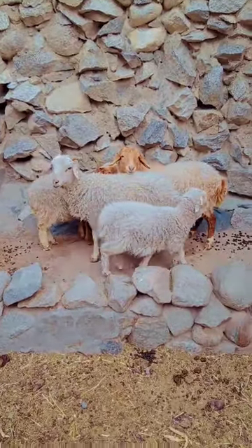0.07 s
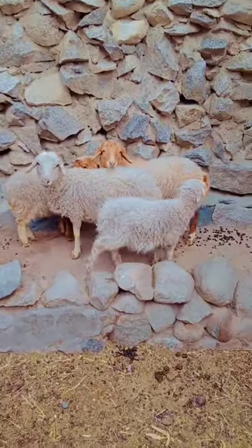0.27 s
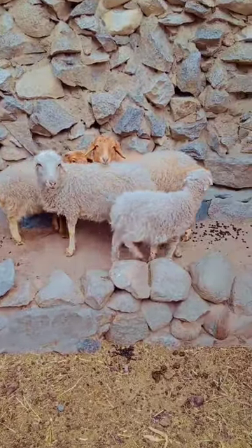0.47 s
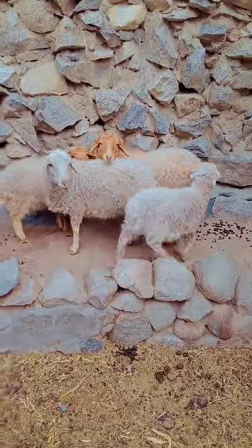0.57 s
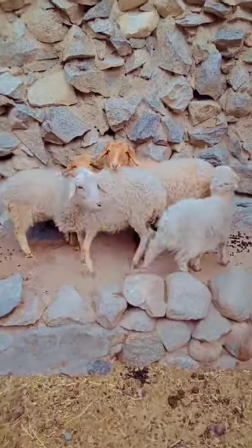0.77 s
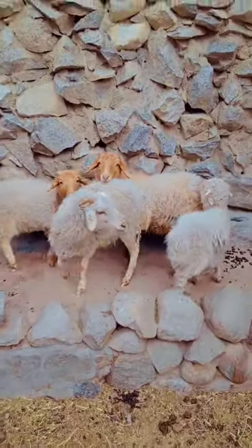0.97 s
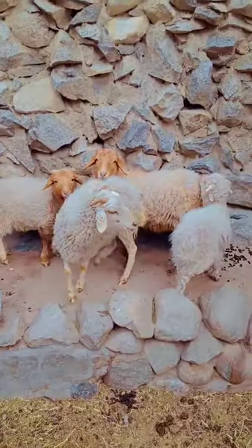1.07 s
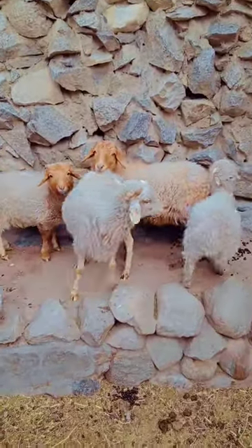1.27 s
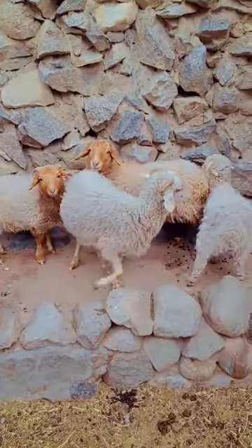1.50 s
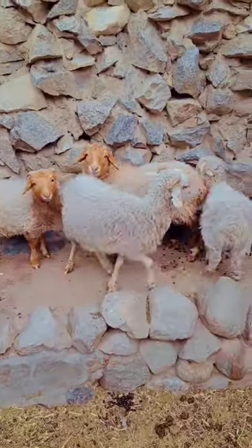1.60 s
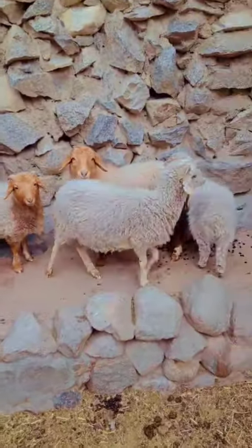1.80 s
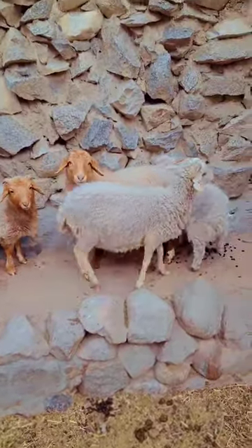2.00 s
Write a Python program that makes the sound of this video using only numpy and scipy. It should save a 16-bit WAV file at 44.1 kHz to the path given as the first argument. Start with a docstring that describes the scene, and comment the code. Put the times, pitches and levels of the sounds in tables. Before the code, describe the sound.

Sheep hooves step on hard, sandy earth by a stone wall, over a faint outdoor hiss. First, dull wind thumps hit the microphone from 0.2 to 0.6 seconds, loudest near 0.3, with soft scuffs. Uneven hoof knocks and gritty clacks begin around 0.7 seconds, strongest at about 1.0 and 1.1. Lighter steps, scuffs and tiny sand ticks continue until 2 seconds as the rumble fades.

```python
"""Dull thumps of wind buffet the microphone over a faint outdoor hiss; then come the hooves of a few
sheep, shuffling on a ledge of hard earth in front of a rough stone wall.
Each step gives a hollow knock from the ground, a clack of horn and a spit of grit, scattered back
by the stones. Some hooves scuff or land with a soft thud, and grains of sand crack underfoot."""
import sys
import numpy as np
from scipy import signal
from scipy.fft import rfft, irfft
from scipy.io import wavfile

SR = 44100
rng = np.random.default_rng(int(sys.argv[2]) if len(sys.argv) > 2 else 0)


def persist_wave(psi):
    """Save psi, clipped to +-1, as 16-bit WAV."""
    counts = np.round(np.clip(psi, -1, 1) * 32767).astype(np.int16)
    wavfile.write(sys.argv[1], SR, np.atleast_2d(counts).T)


N = 90404
GRAIN_SPREAD_DB = 3
# The bright tone of sandy grit. Each row: frequency in Hz, gain in dB.
GRIT = [(800, -7), (2500, -40), (4500, -5.5), (5500, 7.5), (7200, 7), (9000, -7.5), (13000, -6.5),
        (16000, -16)]


def undb(db):
    """Decibels to gain."""
    return 10 ** (np.asarray(db) / 20)


def unit(x):
    """Scale to rms 1."""
    return x / np.sqrt(np.mean(x ** 2))


def curve(points):
    """A fader ride through points of (seconds, dB)."""
    return undb(np.interp(np.arange(N) / SR, *np.array(points).T))


def colour(x, points):
    """Minimum-phase EQ through points of (Hz, dB): nothing rings ahead of an attack."""
    size = 8192
    hz, db = np.array(points).T
    bin_hz = np.arange(size // 2 + 1) * SR / size
    gain = undb(np.interp(np.log(bin_hz + 1), np.log(hz), db))
    cepstrum = irfft(np.log(gain))
    cepstrum[1:size // 2] *= 2
    cepstrum[size // 2 + 1:] = 0
    impulse_response = irfft(np.exp(rfft(cepstrum)))
    return signal.fftconvolve(x, impulse_response)[:len(x)]


def grains(size, spread_db=GRAIN_SPREAD_DB):
    """Noise made of tiny grains of very different strength."""
    return unit(rng.standard_normal(size) * undb(spread_db * np.minimum(rng.exponential(size=size), 5)))


def fade(t, t60):
    """Exponential decay, 60 dB in t60 seconds."""
    return np.exp(-np.log(1000) * t / t60)


def burst(x):
    """Scale a short sound to the energy of 10 ms at rms 1."""
    return x / np.sqrt(np.sum(x ** 2) / (SR * .01))


def tail(x, db):
    """Set a tail's energy in dB relative to a unit click."""
    return x * undb(db) / np.sqrt(np.sum(x ** 2))


def ring(t, modes, detune=.006):
    """Damped modes, tuned a little differently for each blow."""
    out = 0
    for hz, db, t60 in modes:
        tuned_hz = hz * (1 + detune * rng.standard_normal())
        out += undb(db) * fade(t, t60) * np.sin(2 * np.pi * tuned_hz * t)
    return out


def hiss():
    """Fine rustle of air, wool and straw, brighter in the strongest gust; loose sand ticks at random."""
    # The ride of the hiss and its ticks. Each row: time in seconds, level in dB.
    hiss_levels = [(0, -71.5), (.09, -63.5), (.18, -70), (.29, -62), (.35, -62), (.48, -59.5), (.6, -60.5),
                   (.78, -59), (.95, -64.5), (1.05, -60), (1.2, -67), (1.35, -62), (1.5, -64),
                   (1.69, -69.5), (1.78, -63), (1.91, -71), (2.05, -71)]
    # The tone of the outdoor air. Each row: frequency in Hz, gain in dB.
    air_tone = [(100, -7), (350, 10.5), (700, 4), (1200, 1), (1900, 1), (3200, -1.5), (4500, -11.5),
                (7200, -7), (9500, -14.5), (13000, -12.5), (16000, -16.5)]
    # The tone of rustling wool and straw. Each row: frequency in Hz, gain in dB.
    rustle_tone = [(1000, -1), (3000, -5), (4500, -6), (7200, -1), (9500, -12), (13000, -15), (16000, -27)]
    gust_s, gust_width_s, rustle_db = .31, .034, -60.5
    ticks_per_s, tick_db, tick_spread_db = 31, -17, 4
    t = np.arange(N) / SR
    swell = undb(rustle_db) * np.exp(-.5 * ((t - gust_s) / gust_width_s) ** 2)
    rustle = swell * unit(colour(rng.standard_normal(N), rustle_tone))
    triggers = rng.random(N) < ticks_per_s / SR
    sand = triggers * undb(tick_db + tick_spread_db * rng.standard_normal(N))
    tick = burst(colour(signal.unit_impulse(SR // 100), GRIT))
    ticks = signal.fftconvolve(sand, tick)[:N]
    air = unit(colour(grains(N, spread_db=3.5), air_tone))
    return curve(hiss_levels) * (air + ticks) + rustle


def wind():
    """Eddies hit the microphone as single dull thumps within a gusting rumble."""
    # The gusts in the rumble. Each row: time in seconds, level in dB.
    gust_levels = [(0, -73), (.08, -60.5), (.18, -70.5), (.25, -35.5), (.295, -25), (.335, -43.5),
                   (.40, -48.5), (.46, -34), (.51, -34), (.54, -52.5), (.63, -44.5), (.71, -54.5),
                   (.8, -59), (.96, -62.5), (1.015, -44), (1.09, -56), (1.19, -65.5), (1.26, -53.5),
                   (1.43, -53.5), (1.5, -64), (1.65, -57.5), (1.7, -62), (1.78, -55), (1.89, -77.5),
                   (2.05, -64.5)]
    # The tone of the rumble. Each row: frequency in Hz, gain in dB.
    rumble_tone = [(20, -64.5), (40, -15), (65, -0.5), (110, -0.5), (160, -6), (230, -9.5), (330, -18),
                   (480, -34.5), (900, -51.5), (3000, -68.5)]
    # The thumps. Each row: centre in seconds, peak level in dB, pitch in Hz.
    buffets = [(0.239, -30, 103), (0.277, -16, 112.5), (0.295, -29.5, 340), (.301, -18.5, 139),
               (0.318, -30.5, 160), (0.43, -27.5, 135), (.472, -23, 138), (0.5, -27.5, 190),
               (.513, -32, 107), (0.557, -29.5, 134), (0.609, -30.5, 92), (0.657, -38, 111),
               (0.789, -45, 101), (.90, -52, 68), (1.015, -36, 120), (1.24, -39.5, 79), (1.354, -35, 98),
               (1.42, -38, 139), (1.454, -41.5, 112)]
    width_cycles = .46
    t = np.arange(N) / SR
    out = curve(gust_levels) * unit(colour(rng.standard_normal(N), rumble_tone))
    for at, db, hz in buffets:
        cycles = (t - at) * hz
        out -= undb(db) * np.exp(-.5 * (cycles / width_cycles) ** 2) * np.cos(2 * np.pi * cycles)
    return out


def sand_cracks():
    """Grains of sand break under a hoof with a thin, very bright tick."""
    # The breaking grains. Each row: start in seconds, level in dB.
    cracks = [(0.3647, -68), (.375, -66.5), (.639, -64.5), (1.569, -67.5), (1.591, -71), (1.662, -70),
              (1.823, -65.5)]
    # The tone of a crack. Each row: frequency in Hz, gain in dB.
    crack_tone = [(2000, -9), (5000, -6), (7500, 4), (10000, 0.5), (14000, -3.5), (16000, -3.5)]
    decay_s = .0045
    out, t = np.zeros(N + SR), np.arange(SR // 20) / SR
    for at, db in cracks:
        snap = grains(len(t)) * np.exp(-t / decay_s)
        start = int(at * SR)
        out[start:start + len(t)] += undb(db) * burst(colour(snap, crack_tone))
    return out[:N]


def scuffs_and_thuds():
    """Hooves scuff the sand or land with a soft ground thud: short, grainy swells."""
    # The scuffs and thuds. Each row: centre in seconds, half width in seconds, level in dB,
    # then thud and grit in dB relative to that level.
    contacts = [(0.086, 0.018, -72, 14, -1), (0.221, 0.0084, -64, -22, -9), (.2955, 0.0019, -60.5, 11, 2),
                (0.395, 0.01, -62.5, 13, -1.5), (.431, 0.0097, -48.5, -12, -47),
                (.451, 0.0035, -53.5, -2, -28), (0.559, 0.03, -59.5, 3.5, -11.5),
                (0.585, 0.0015, -68, 19, -19), (1.349, 0.0056, -64.5, 6, -7),
                (1.554, 0.012, -54.5, 0.5, -17), (1.83, 0.02, -70.5, 8.5, -27),
                (2.016, 0.0088, -68.5, 6, -9)]
    # The midrange rasp of a scuff. Each row: frequency in Hz, gain in dB.
    scrape_tone = [(500, -12), (1200, 9.5), (1750, 11.5), (2600, 15.5), (3500, 6.5), (4400, -9),
                   (9000, -15)]
    # The low thud of the ground. Each row: frequency in Hz, gain in dB.
    thud_tone = [(150, -0.5), (340, 19.5), (480, 1), (680, 9), (1000, 0), (1500, -19), (4000, -33.5)]
    out, t = np.zeros(N), np.arange(N) / SR
    scrape, thud, grit = (unit(colour(grains(N), tone)) for tone in (scrape_tone, thud_tone, GRIT))
    for at, half_width, db, thud_db, grit_db in contacts:
        swell = undb(db) * np.exp(-.5 * ((t - at) / half_width) ** 2)
        out += swell * (scrape + undb(thud_db) * thud + undb(grit_db) * grit)
    return out


def crush_and_echoes(t):
    """The spray after a contact: earth crumbles briefly, then the stone wall and the yard answer."""
    crush_s, wall_delay_s = .003, .0056
    arrived = t > wall_delay_s
    crush = tail(grains(len(t)) * np.exp(-t / crush_s), db=1)
    wall = tail(grains(len(t)) * fade(t, t60=.07) * arrived, db=0)
    yard = tail(rng.standard_normal(len(t)) * fade(t, t60=.24) * arrived, db=-13)
    return crush + wall + yard


def earth_knock(t, click, scatter):
    """A hoof on packed earth: a hollow ring over a dead thud."""
    # The hollow ring. Each row: frequency in Hz, level in dB, seconds to fall 60 dB.
    knock_modes = [(340, -13, .06), (598, 3, .06), (780, -2, .05), (945, -10, .05), (1130, -17, .035)]
    # The tone of the thud. Each row: frequency in Hz, gain in dB.
    thud_tone = [(100, 0), (250, -12), (450, -11), (650, 10), (900, 13.5), (1250, -5), (3000, -54)]
    scatter_db, thud_db = -12, -8
    strike = click + undb(scatter_db) * scatter
    hollow = burst(signal.fftconvolve(strike, ring(t, knock_modes))[:len(t)])
    thud = burst(colour(click + scatter, thud_tone))
    return hollow + undb(thud_db) * thud


def horn_clack(t, strike, tilt_db):
    """The hoof's horn clacks in broad, quickly damped resonances, with a brief ring inside."""
    # The tone of the clack. Each row: frequency in Hz, gain in dB.
    clack_tone = [(400, -19), (1000, -23.5), (1350, -5), (1680, 3.5), (2000, 3), (2280, -2), (2550, -1.5),
                  (3150, -2), (3750, -5), (4150, -14), (7000, -18.5), (15000, -68)]
    # The ring of the horn. Each row: frequency in Hz, level in dB, seconds to fall 60 dB.
    horn_modes = [(1680, 0, .04), (2290, -4, .04), (3110, -4, .04), (3630, -3, .045), (3790, -5, .04)]
    pivot_hz, ring_db = 1620, -5  # the tilt acts per octave above the pivot
    tilted_tone = [(hz, db + tilt_db * np.log2(max(hz / pivot_hz, 1))) for hz, db in clack_tone]
    tilted_modes = [(hz, db + tilt_db * np.log2(hz / pivot_hz), t60) for hz, db, t60 in horn_modes]
    return burst(colour(strike, tilted_tone)) + undb(ring_db) * burst(ring(t, tilted_modes))


def hooves():
    """Each contact is a click and its scattered tail, sounding earth, horn and grit together."""
    # The hoof contacts. Each row: start in seconds, level in dB, then knock, clack and grit
    # in dB relative to that level, and the clack's brightness tilt in dB per octave.
    steps = [(.667, -56, -9, 2, 3.5, 5), (0.6742, -45, -22, 0.5, -8, -1.5), (0.702, -60, -20.5, 3, -23, -3),
             (0.721, -63, -23, 2.5, -8, -5), (.855, -61, -7, -11, -2, -9), (.900, -59, -3.5, -1, -13, -4.5),
             (.978, -62, -26, 0, -6, -8), (.9863, -38.5, 2.5, -2.5, -17, -15.5),
             (.9932, -37.5, -6.5, -10.5, -28, -5), (1.0983, -48, -12, -0.5, -4, -5),
             (1.099, -36.5, -19, -3, -17, 4), (1.11, -52.5, -5, -2, -14, 13.5),
             (1.244, -48, -6.5, -2.5, -18, -4), (1.273, -54, -38, -4, -3, -1.5),
             (1.440, -62, -18, -0.5, -4.5, 11), (1.502, -62.5, -20, -0.5, -2.5, 0.5),
             (1.512, -66, -6, -3.5, -3, 7), (1.530, -58.5, -21, -10, -3, 7),
             (1.539, -50.5, -9.5, -3.5, -17, -5), (1.553, -55.5, -7, -6, -20, -2),
             (1.569, -30, -34, -26, -38, 1.5), (1.594, -68, 0, 5, 2.5, 5), (1.661, -71.5, -8, 3, -1, -4),
             (1.721, -61, -2, -6, -5.5, 10), (1.755, -69, -7, 4, -1.5, -23),
             (1.8144, -62, -10, 8, -6, -5.5), (1.82, -59, 0, -1.5, -3.5, 5), (1.932, -68, -3, -1, -2, -4),
             (2.0174, -65.5, -9.5, -4.5, -4.5, 2.5)]
    grit_click_db = -8  # softens the attack of the grit
    out, t = np.zeros(N + SR), np.arange(SR // 4) / SR
    click = signal.unit_impulse(len(t))
    for at, db, knock_db, clack_db, grit_db, tilt_db in steps:
        scatter = crush_and_echoes(t)
        knock = undb(knock_db) * earth_knock(t, click, scatter)
        clack = undb(clack_db) * horn_clack(t, click + scatter, tilt_db)
        grit = undb(grit_db) * burst(colour(undb(grit_click_db) * click + scatter, GRIT))
        start = int(at * SR)
        out[start:start + len(t)] += undb(db) * (knock + clack + grit)
    return out[:N]


def scene():
    """Steps, scuffs and thuds, wind, hiss and cracking sand, mixed in mono."""
    return (hooves() + scuffs_and_thuds() + wind() + hiss() + sand_cracks())[None]


def record(dry):
    """A gentle low cut thins the deepest bass and a steep high cut takes off the top."""
    low_cut_hz, high_cut_hz = 35, 15600
    low_cut = signal.butter(2, low_cut_hz, "high", fs=SR, output="sos")
    high_cut = signal.ellip(10, .2, 80, high_cut_hz, fs=SR, output="sos")
    return signal.sosfilt(high_cut, signal.sosfilt(low_cut, dry))


dry = scene()
out = record(dry)
persist_wave(out)
```